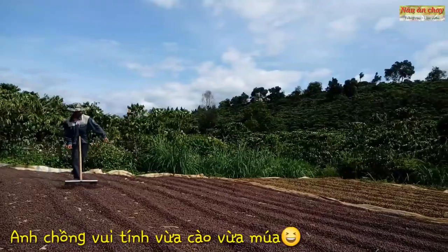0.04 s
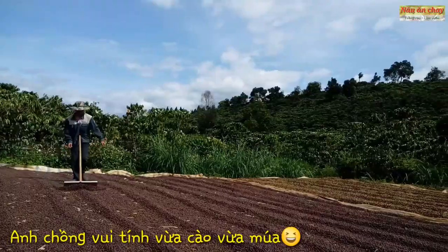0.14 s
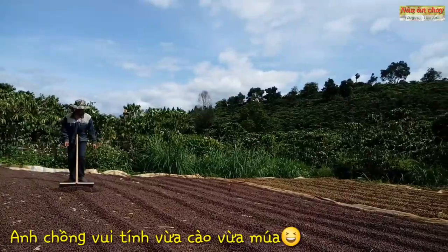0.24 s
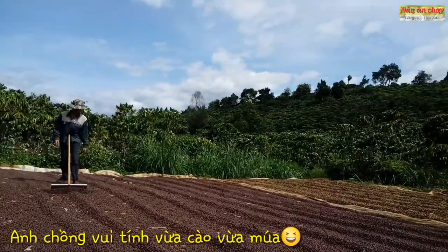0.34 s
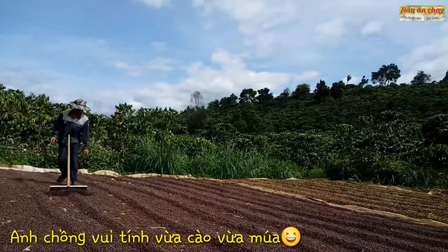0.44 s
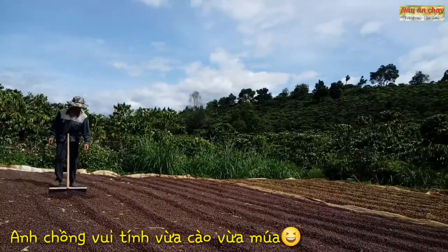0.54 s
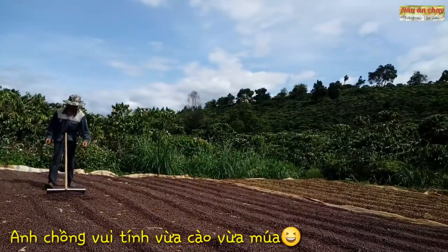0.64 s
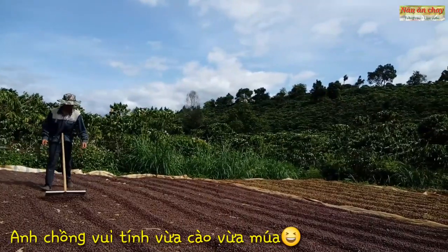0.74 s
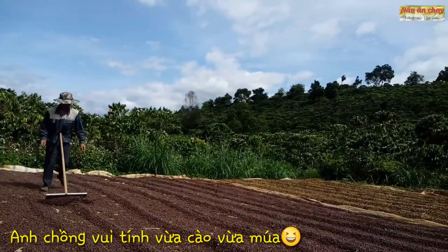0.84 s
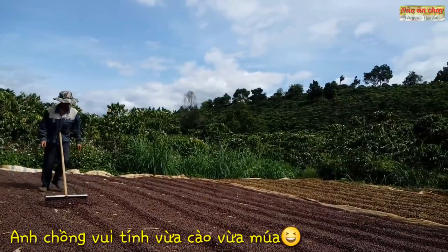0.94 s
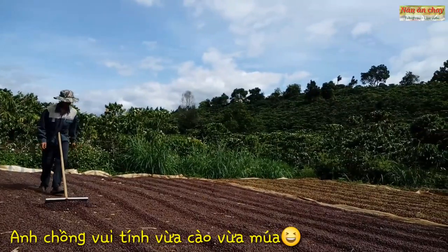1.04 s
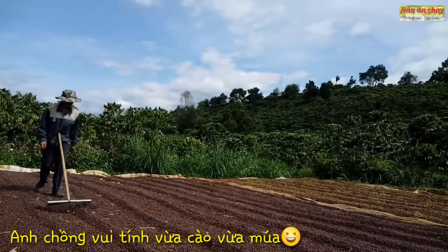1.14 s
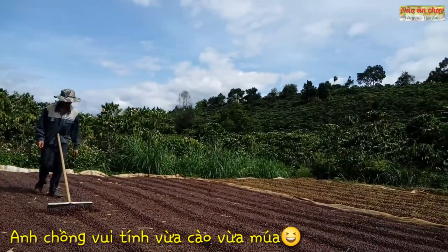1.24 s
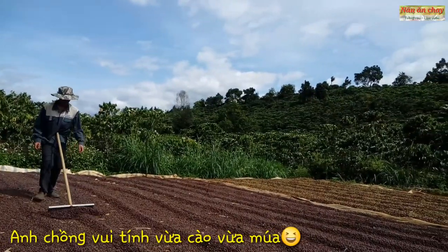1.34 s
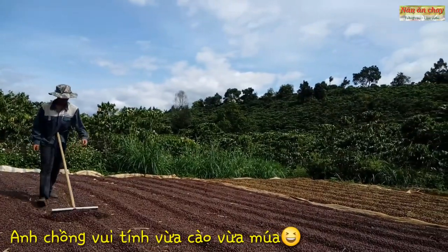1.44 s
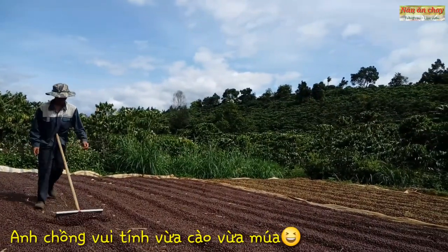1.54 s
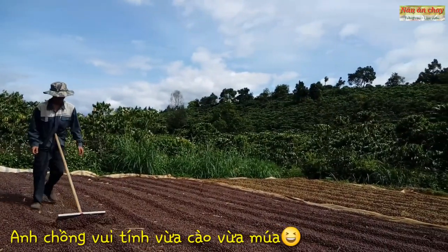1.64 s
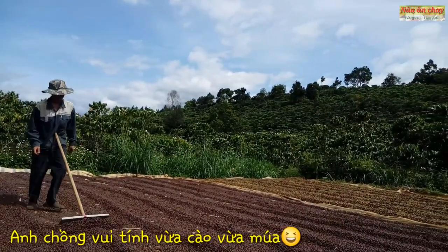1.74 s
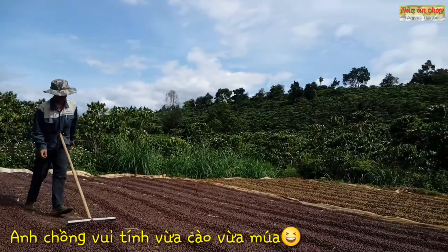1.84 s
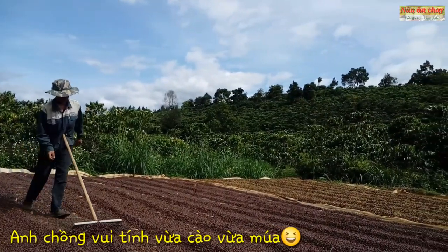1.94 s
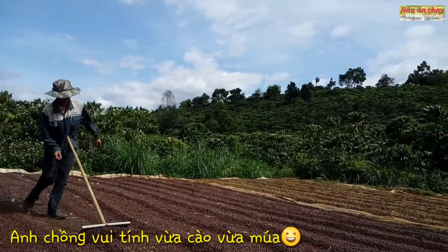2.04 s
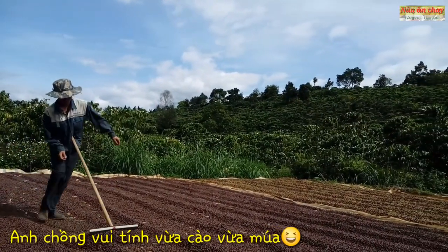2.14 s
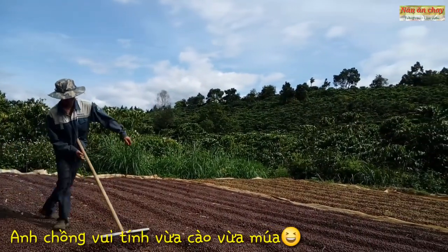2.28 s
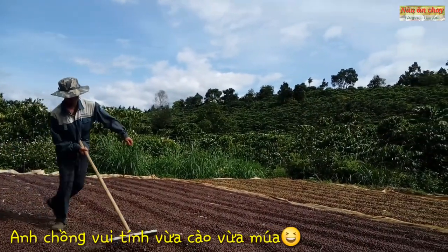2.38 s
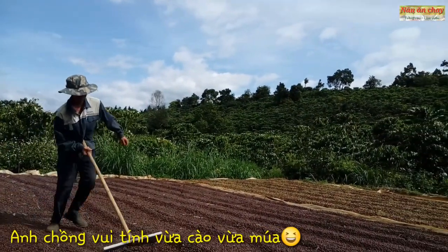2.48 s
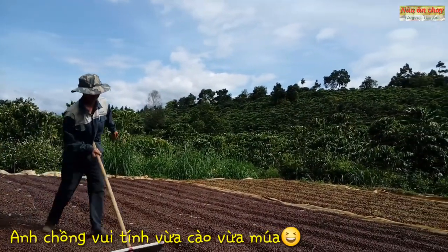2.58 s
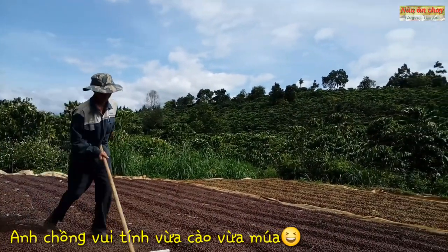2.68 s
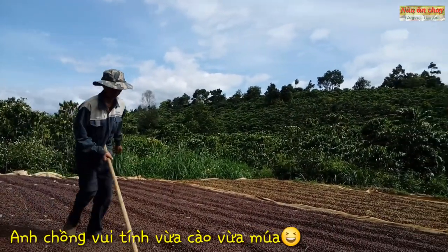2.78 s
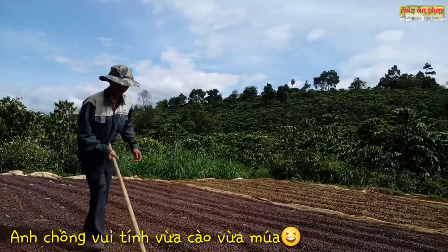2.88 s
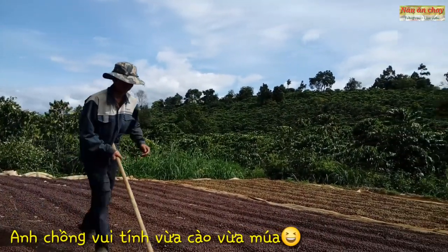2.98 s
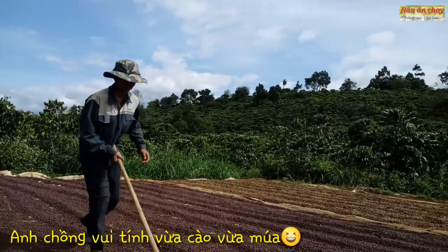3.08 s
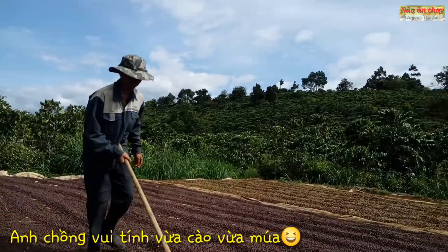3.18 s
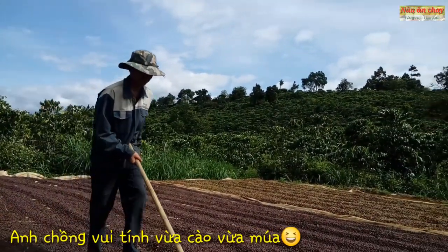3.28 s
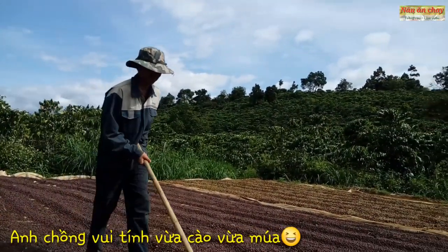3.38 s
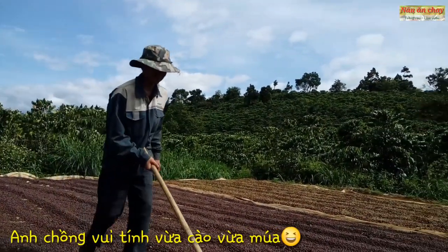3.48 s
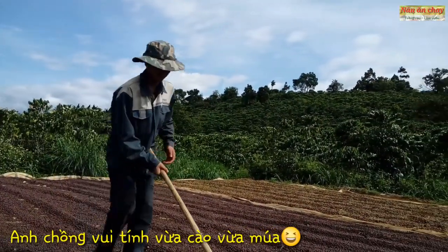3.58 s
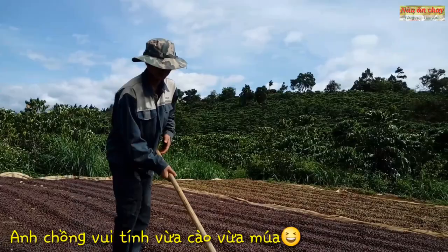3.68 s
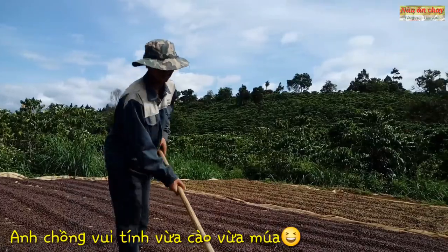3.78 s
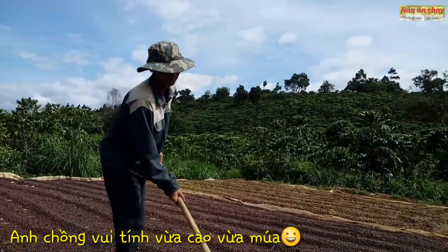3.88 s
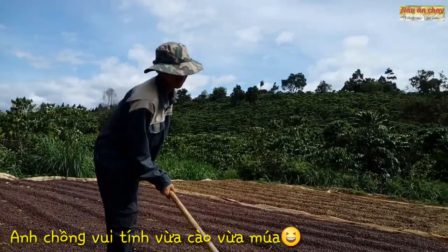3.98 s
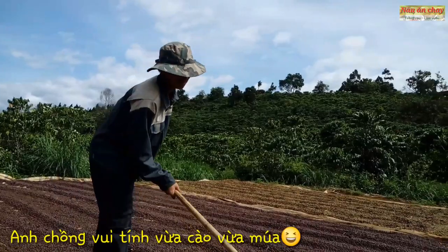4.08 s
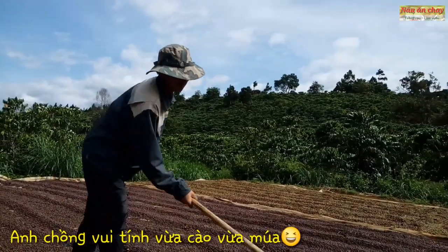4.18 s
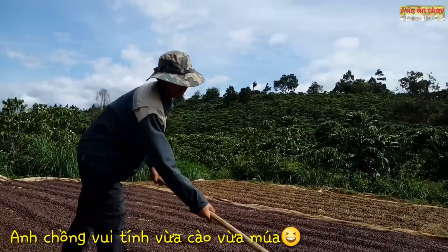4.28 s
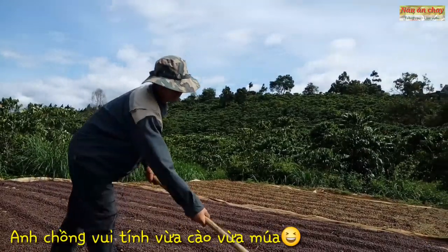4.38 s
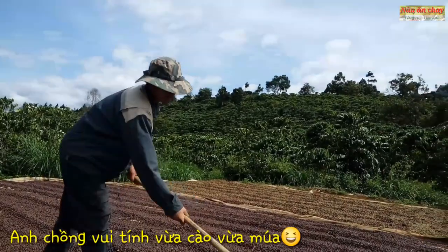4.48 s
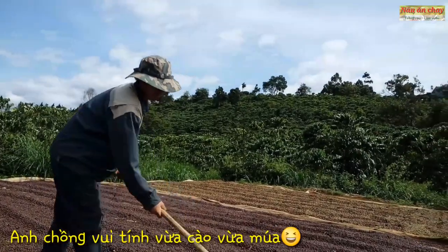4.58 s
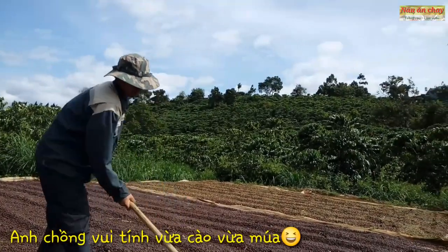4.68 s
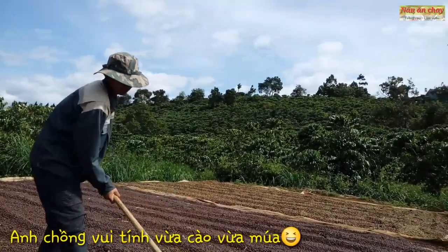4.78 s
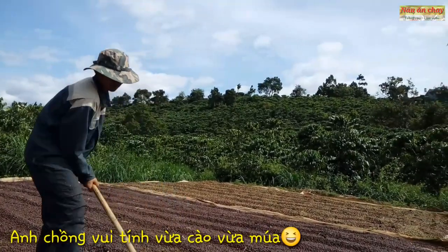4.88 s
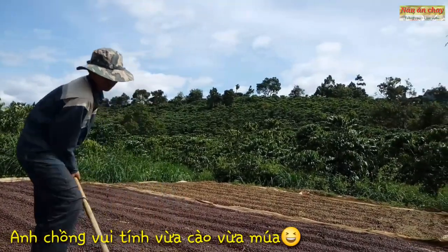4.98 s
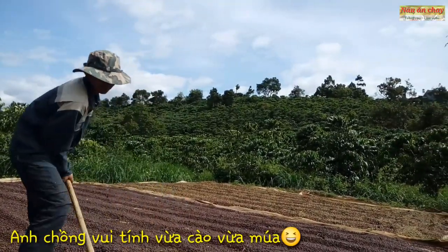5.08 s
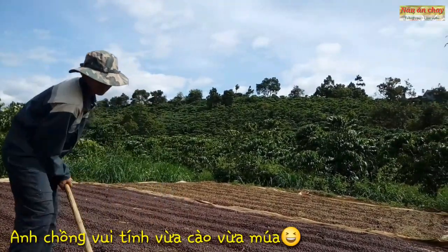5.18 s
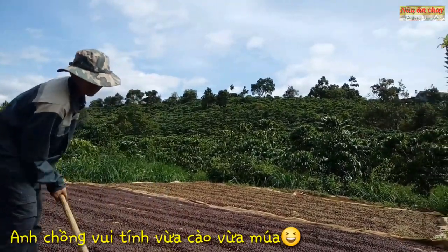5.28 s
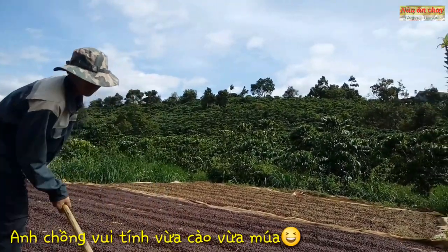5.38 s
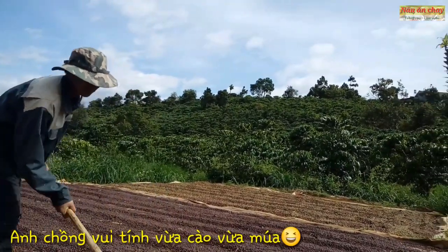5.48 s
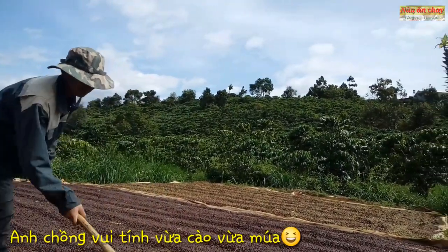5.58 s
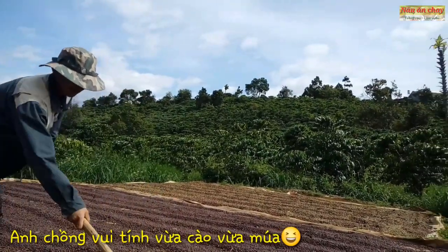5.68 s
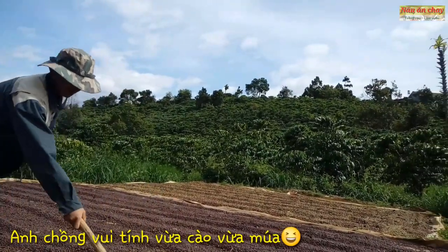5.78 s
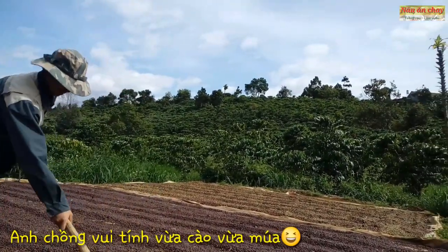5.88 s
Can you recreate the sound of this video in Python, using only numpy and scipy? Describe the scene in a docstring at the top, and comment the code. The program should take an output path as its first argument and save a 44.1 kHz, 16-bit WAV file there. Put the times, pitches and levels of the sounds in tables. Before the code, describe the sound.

Outdoors on a quiet hillside, a wide rake is pulled through dry coffee cherries. Thousands of tiny clicks merge into a grainy, rattling scrape that surges with each step and grows louder as it approaches the single phone microphone. Soft wind bumps sit beneath it. The rake lifts, a few cherries knock on it, then a crisp second pull follows and a third begins at the end.

```python
"""Thousands of dry husks rattle near a phone: a wide rake is dragged through coffee cherries drying on tarps.
The farmer walks up to the microphone, from 6 m to under 4 m, then lifts the rake and pulls twice more.
The husks are random clicks that ring the rake's resonances; a close reflection sweeps their colour.
Stray cherries knock on the lifted rake, and it holds a faint sine note.
Behind it, low-passed and band-passed noise makes wind on the microphone and a quiet hillside."""
import sys
import numpy as np
from scipy import signal
from scipy.fft import rfft, irfft, next_fast_len
from scipy.io import wavfile
from scipy.ndimage import uniform_filter1d, map_coordinates

SR = 44100
rng = np.random.default_rng(int(sys.argv[2]) if len(sys.argv) > 2 else 0)


def master(y):
    """Save y as 16-bit WAV."""
    cut = np.clip(np.atleast_2d(y).T, -1, 1)
    pcm = np.round(cut * 32767)  # scale
    wavfile.write(sys.argv[1], SR, pcm.astype(np.int16))


N = 261513
T = np.arange(N) / SR

# In all swells the half length is the time from the top down to 1/e.
# hush of the distant foliage: f/Hz, relative level/dB
HILLSIDE = [(18, -52), (30, -19), (119, -3), (296, -5), (394, 1), (978, -0.5), (1090, -4), (1440, -0.5),
            (1970, -2), (2370, -0.5), (7060, -17), (11300, -13), (15000, -21)]
# gusts on the microphone: t/s, half length/s, level/dB before the flutter of the wind
GUSTS = [(.74, 0.21, -43), (.9, .07, -35), (1.07, .04, -32.5), (1.2, 0.025, -44), (1.423, .08, -44),
         (1.595, 0.065, -39), (1.77, 0.06, -40.5), (2.5, .12, -59), (2.873, .02, -42), (3.002, .06, -37)]
# soft low bumps of air on the microphone: t/s, level/dB before the envelope, decay to 1/e/s, upper edge f/Hz
BUMPS = [(.17, -33.5, 0.022, 130), (.485, -30.5, 0.034, 146), (2.545, -32, 0.013, 129),
         (3.085, -32, 0.018, 123), (3.19, -32, 0.019, 131), (4.17, -49, 0.069, 121),
         (4.223, -34, 0.015, 202), (4.274, -41, 0.021, 118)]
# single cherries that knock on the rake: t/s, peak level/dB
KNOCKS = [(4.026, -28), (4.061, -37), (4.124, -34), (4.477, -29.5)]
# what a knock rings with: f/Hz, relative level/dB, decay by 60 dB/s
KNOCK_MODES = [(793, -16.5, 0.01), (2070, -5, 0.024), (3330, -12, 0.027), (3700, 1, 0.012),
               (4450, -13.5, .012)]
# thin notes of the rake clear of the heap: t/s, half length/s, f/Hz at t, glide/(Hz/s), level/dB before wavering
RINGS = [(4.208, 0.1, 2470, 599, -57), (5.782, .11, 2560, -100, -42)]
# pulls, from setting the rake in to lifting it out: bite t/s, lift t/s, fade after lifting/(dB/s), crisp bite/dB
PULLS = [(-.1, 3.874, 87, 5), (4.509, 5.71, 62, 10.5), (5.858, 6.2, 62, -0.5)]
# each step or tug of the arms shoves the rake on:
# t/s, half length/s, push/dB, extra weight of the heap/dB, extra scrape/dB
SHOVES = [(0.205, 0.06, 1.7, -1.3, 0.2), (0.506, 0.13, 3, 1.1, 2), (0.905, 0.16, 3, 0.7, 0.1),
          (1.288, .13, 3.2, 0.5, -0.5), (1.666, 0.17, 5.5, 0.4, -1.9), (2.132, 0.14, 5.5, 0.3, -2.1),
          (2.47, .16, 5, -0.5, 0), (2.788, 0.17, 7, 0, 2.5), (3.219, .19, 8, -1, 0),
          (3.582, .19, 10, -2.3, -1.5), (3.744, 0.044, 4, -1, 0.4), (4.532, 0.029, 7, -3, -2),
          (4.685, 0.061, -0.5, 2.5, 4), (4.768, .14, 5, -7.5, -3), (5.084, 0.089, 2, -2.5, 1.4),
          (5.196, 0.071, 4, -1.7, -1.1), (5.388, 0.073, 3.5, 3.5, 2), (5.531, .13, 8, -0.3, -.5),
          (5.905, .036, 7.5, 0.5, -0.5)]
# how the rake is held: t/s, firmness of the grip/0-1, lift/0-1, delay of its close reflection/ms
POSE = [(0.0, 0.13, 0.18, 0.95), (1.8, 0.1, 0.01, 0.93), (2.7, 0.53, 0.0, 0.9), (3.45, 0.8, 0.1, 0.9),
        (3.9, 0.88, 0.5, 0.68), (4.7, 1, 0.4, 0.714), (5.05, 0.64, 0.36, 0.823), (5.45, 1, 0.33, 0.93),
        (5.78, 1.0, 0.86, 0.75), (5.93, 0.97, 0.57, 0.71)]
# colour of the clicking husks, before the bands are balanced: f/Hz, relative level/dB
HUSK_COLOUR = [(30, -37.5), (60, -28), (170.0, -14), (350.0, -6), (800.0, -7.5), (1400.0, -5),
               (3200.0, 0.36), (5400.0, -2.5), (6000.0, -3.5), (6800.0, -7.5), (9300.0, -10.5),
               (11200.0, -21), (12500.0, -35), (15000, -48)]
# resonances and dips of the rake:
# f/Hz, width/Hz, level/dB trailing loosely, level/dB pressed into the heap, level/dB skimming
RAKE_MODES = [(308, 140, 0.5, -0.5, -4.5), (458, 79, 1.5, 4.5, -5.5), (658, 118, 3, 10.5, -2.5),
              (868, 130, 6.5, -3, -13), (1000, 155, -1, 10, 0), (1184, 75, -5, -3, 10.5),
              (1426, 83, 5.5, -0.5, 7), (1600, 56, -0.5, -2.5, 7), (1990, 110, -8, 2.5, -0.5),
              (2210, 340, -0.5, -4.5, -1.5), (2640, 320, -9, 5.5, -5.5), (2840, 67, -8.5, 4.5, 3),
              (3200, 190, 2.5, -1, -9), (3510, 120, 1, 6.5, -1), (3750, 130, -2.5, 6.5, -1.5),
              (4060, 320, 4, 4.5, -1), (4860, 170, -0.5, 10, 0), (5520, 830, 2.5, -1, 4)]

BREEZE_DB, CALM_DB = -55, -70  # between gusts, before the flutter of the wind
CALMING_FROM_S, CALM_AT_S = 3.45, 3.9  # the breeze dies down
START_M, NEAREST_M, WALK_M_PER_S = 6.145, 3.66, 0.55  # distance from the microphone
DRAG_DB = -18.5  # middle band of an unhurried rattle at 1 m
HEAP_DB, SCRAPE_DB, CRISP_DB = -7, 2.26, -11.5  # other bands relative to the middle one, before the strokes act
LIFT_HEAP_DB, LIFT_CRISP_DB = -6, 7.5  # a fully lifted rake pushes less heap and flicks more loose husks
CRISP_PER_SCRAPE, CRISP_PER_PUSH = 1.2, -0.13  # dB per dB
TRICKLE_DB = -2.5  # below this effort the cherries only trickle and lose their edge
CRISP_DULLING, SCRAPE_DULLING = 0.39, 0.16  # dB per dB of effort below the trickle
BITE_RISE_S, BITE_DECAY_S = 0.0053, 0.05
REST_CLICKS_PER_S, DRAG_CLICKS_PER_S = 300, 15000  # settling cherries, and those added at effort 1
REFLECTION_SHARE = 0.21  # amplitude beside the direct sound
TOP_HZ = 15400


def undb(db):
    """Decibels to gain."""
    return 10 ** (np.asarray(db) / 20)


def unit(x):
    """Scale to rms 1."""
    return x / np.sqrt(np.mean(x ** 2))


def steady(x):
    """Even out the level to rms 1 over a sliding half second."""
    return x / np.sqrt(uniform_filter1d(x ** 2, SR // 2))


def curves(table):
    """Each column after the time, sample by sample."""
    s, *columns = np.transpose(table)
    return [np.interp(T, s, column) for column in columns]


def swell(s, half_length):
    """A smooth rise and fall around the moment s, 1 at its top."""
    return np.exp(-((T - s) / half_length) ** 2)


def wander(rate):
    """Random wander of rms 1, in straight segments, rate of them per second."""
    knots = rng.standard_normal(4096)
    return unit(np.interp(T * rate, np.arange(len(knots)), knots))


def shape(x, response):
    """Filter by a frequency response."""
    size = next_fast_len(N, real=True)
    hz = np.fft.rfftfreq(size, 1 / SR) + 1e-3  # keeps the logarithm finite at 0 Hz
    return irfft(rfft(x, size) * response(hz), size)[:N]


def colour(x, points):
    """Filter by a response of f/Hz, level/dB points, joined on a logarithmic frequency scale."""
    hz, db = np.transpose(points)
    return shape(x, lambda f: undb(np.interp(np.log(f), np.log(hz), db)))


def band(x, lo_hz, hi_hz, order=3):
    """Band-pass."""
    return signal.sosfilt(signal.butter(order, [lo_hz, hi_hz], "band", fs=SR, output="sos"), x)


def lows(x, hz, order=20):
    """The part of x below hz."""
    return shape(x, lambda f: 1 / (1 + (f / hz) ** order))


def ring(x, hz, width):
    """One resonance, gain 1 at its centre."""
    return signal.lfilter(*signal.iirpeak(hz, hz / width, fs=SR), x)


def hillside(level_db=-60):
    """Faint, slowly swelling hush of distant foliage: coloured noise."""
    hush = unit(colour(rng.standard_normal(N), HILLSIDE))
    return undb(level_db + 0.51 * wander(1.8)) * hush


def wind():
    """Eddies at the microphone, as low noise: a fitful breeze that dies down, gusts and single bumps."""
    breeze_db = np.interp(T, [CALMING_FROM_S, CALM_AT_S], [BREEZE_DB, CALM_DB])
    gusts = sum(undb(db) * swell(s, half_length) for s, half_length, db in GUSTS)
    flutter = undb(-2.0 + 2.5 * wander(24.94))
    out = unit(band(rng.standard_normal(N), 44, 101, order=2)) * (undb(breeze_db) + gusts) * flutter
    for s, db, decay, edge_hz in BUMPS:
        age = np.maximum(T - s, 0)
        envelope = (1 - np.exp(-age / 0.0026)) * np.exp(-age / decay)
        out += undb(db) * unit(band(rng.standard_normal(N), 39, edge_hz, order=5)) * envelope
    return out


def knocks():
    """Stray cherries tick on the raised rake: decaying modes and a burst of contact noise."""
    out, t = np.zeros(N), np.arange(4096) / SR
    for s, db in KNOCKS:
        tick = 0.94 * rng.standard_normal(len(t)) * np.exp(-t / 0.0017)
        for hz, mode_db, t60 in KNOCK_MODES:
            struck_hz = hz * (1 + 0.017 * rng.standard_normal())  # no two knocks quite alike
            tick += undb(mode_db) * np.sin(2 * np.pi * struck_hz * t) * np.exp(-np.log(1000) * t / t60)
        tick = band(tick, 450, 4700, order=6)
        i = int(s * SR)
        out[i:i + len(t)] += undb(db) * tick / np.abs(tick).max()
    return out


def singing():
    """Lifted clear, the rake is hardly damped and holds a faint, thin, wavering note."""
    waver, notes = 1 + 0.005 * wander(120), np.zeros(N)
    for s, half_length, hz, glide_hz_per_s, db in RINGS:
        pitch_hz = (hz + glide_hz_per_s * (T - s)) * waver
        phase = 2 * np.pi * np.cumsum(pitch_hz) / SR
        notes += undb(db) * swell(s, half_length) * np.sqrt(2) * np.sin(phase)  # sine of rms 1
    return undb(2.5 * wander(53)) * notes


def collisions(rate, spread_db, click_s, count=32):
    """Random clicks, many faint and a few loud; each of count kinds of husk has its own brief ring."""
    t = np.arange(256) / SR
    rings = rng.standard_normal((count, len(t))) * np.exp(-t / click_s)
    rings /= np.linalg.norm(rings, axis=1, keepdims=True)
    at = np.flatnonzero(rng.random(N) < rate / SR)
    kind = rng.integers(count, size=len(at))
    strength = np.minimum(rng.exponential(size=len(at)), 5)
    clicks = undb(spread_db * strength)[:, None] * rings[kind]
    places = at[:, None] + np.arange(len(t))
    out = np.bincount(places.ravel(), clicks.ravel(), N)[:N]
    return unit(out / np.sqrt(rate))  # the rate sets the density, not the level


def reflect(x):
    """A copy arrives up to a millisecond late and combs the spectrum; the comb moves with the pose of the rake."""
    _, _, delay_ms = curves(POSE)
    late = map_coordinates(x, [(T - delay_ms / 1000) * SR], order=3)
    return (x + REFLECTION_SHARE * late) / np.sqrt(1 + REFLECTION_SHARE ** 2)


def through_rake(x):
    """The rake rings along with the husks; grip and lift decide which of its resonances speak."""
    grip, lift = np.clip(curves(POSE)[:2], 0, 1)
    for hz, width, loose_db, pressed_db, skim_db in RAKE_MODES:
        held_db = pressed_db + lift * (skim_db - pressed_db)
        mode_db = loose_db + grip * (held_db - loose_db)
        x = x + (undb(mode_db) - 1) * ring(x, hz, width)
    return x


def strokes():
    """Effort and three band levels: the rake bites, surges with each shove and fades once lifted."""
    push_db, weight_db, scrape_db = sum(np.outer(dbs, swell(s, half_length)) for s, half_length, *dbs in SHOVES)
    contact, bite_db = np.zeros(N), np.zeros(N)
    for bites, lifts, fade_db_per_s, crispness_db in PULLS:
        age = np.maximum(T - bites, 0)
        entry = np.clip(age / BITE_RISE_S, 0, 1)
        hold = undb(-fade_db_per_s * np.maximum(T - lifts, 0))
        contact += entry * (hold - contact)  # each new pull takes over from the last
        bite_db += entry * crispness_db * np.exp(-age / BITE_DECAY_S)
    effort = contact * undb(push_db)
    lift = np.clip(curves(POSE)[1], 0, 1)
    slowing_db = np.maximum(TRICKLE_DB - 20 * np.log10(effort), 0)

    heap_db = HEAP_DB + LIFT_HEAP_DB * lift + weight_db
    crisp_db = CRISP_DB + LIFT_CRISP_DB * lift + bite_db
    crisp_db += CRISP_PER_SCRAPE * scrape_db + CRISP_PER_PUSH * push_db - CRISP_DULLING * slowing_db
    scrape_db = SCRAPE_DB + scrape_db - SCRAPE_DULLING * slowing_db
    return effort, heap_db, scrape_db, crisp_db


def raking(heap_hz=830, scrape_hz=2870, crisp_hz=6750):
    """Cherries tumble ahead of the rake, louder as it nears; fewer collide as the pull dies away."""
    effort, heap_db, scrape_db, crisp_db = strokes()
    distance_m = np.maximum(START_M - WALK_M_PER_S * T, NEAREST_M)
    clicks_per_s = REST_CLICKS_PER_S + DRAG_CLICKS_PER_S * np.minimum(effort, 2)
    husks = collisions(clicks_per_s, spread_db=2.5, click_s=0.00059)
    rattle = colour(through_rake(reflect(husks)), HUSK_COLOUR)

    # the pushed heap gives the low rumble, a faster pull more scrape, loose husks on top the crisp edge
    heap = lows(rattle, heap_hz)
    below_scrape = lows(rattle, scrape_hz)
    below_crisp = lows(rattle, crisp_hz)
    mix = steady(below_scrape - heap)
    mix += undb(heap_db) * steady(heap)
    mix += undb(scrape_db) * steady(below_crisp - below_scrape)
    mix += undb(crisp_db) * steady(rattle - below_crisp)
    return undb(DRAG_DB) * effort / distance_m * mix


def scene():
    """Everything reaches one microphone, the same in both channels."""
    mono = hillside() + wind() + knocks() + singing() + raking()
    return np.array([mono, mono])


def record(dry):
    """The phone cuts the top with a steep low-pass."""
    return signal.sosfilt(signal.ellip(8, 0.2, 70, TOP_HZ, fs=SR, output="sos"), dry)


dry = scene()
out = record(dry)
master(out)
```